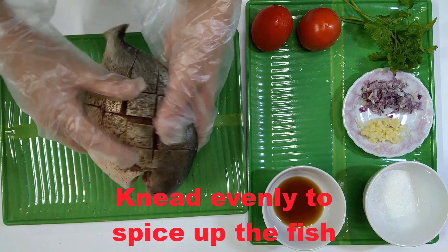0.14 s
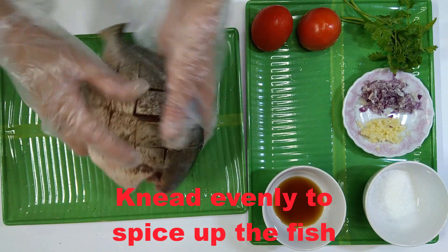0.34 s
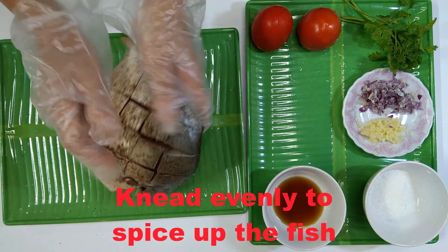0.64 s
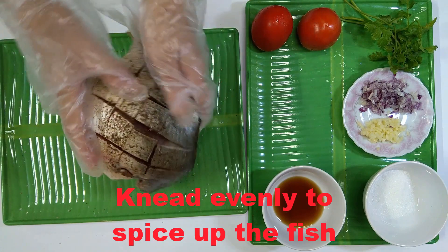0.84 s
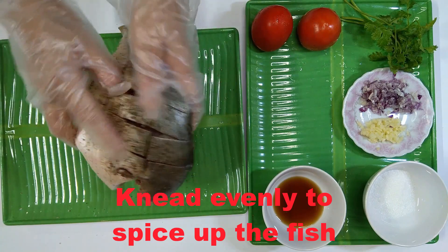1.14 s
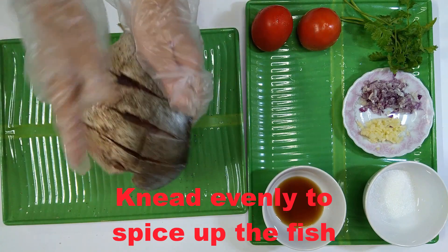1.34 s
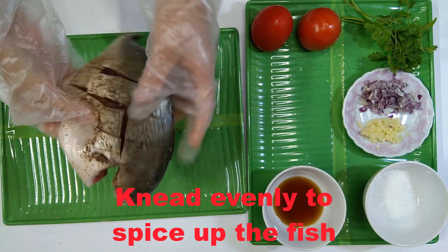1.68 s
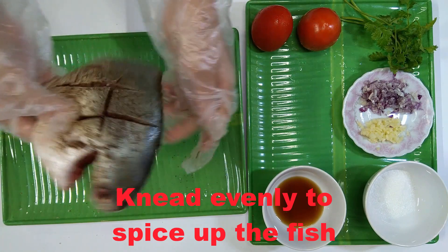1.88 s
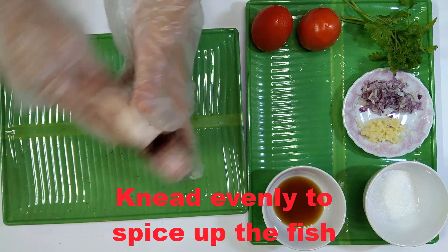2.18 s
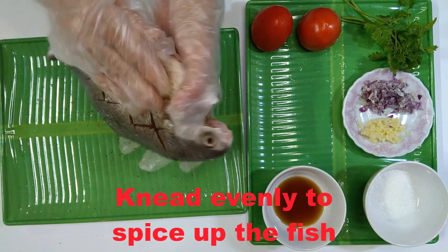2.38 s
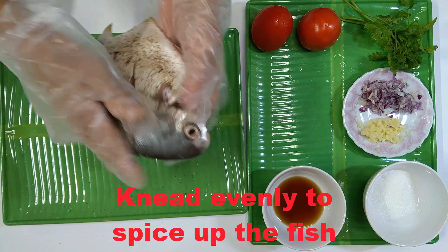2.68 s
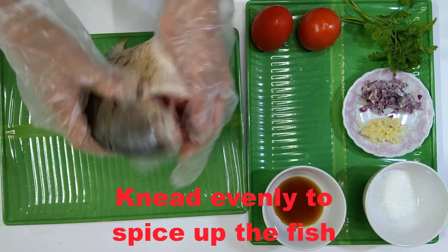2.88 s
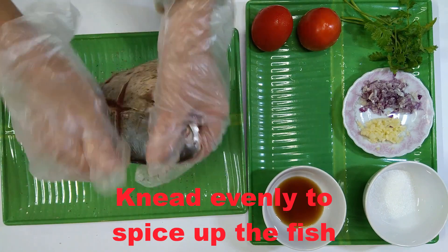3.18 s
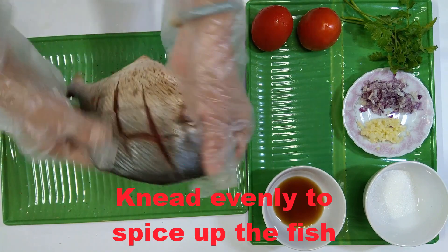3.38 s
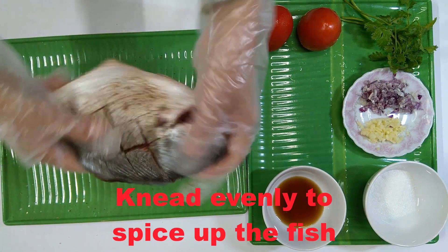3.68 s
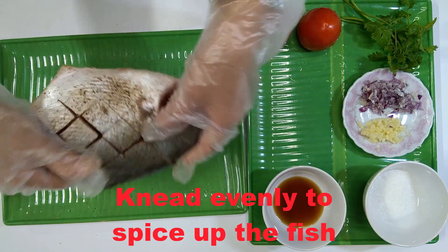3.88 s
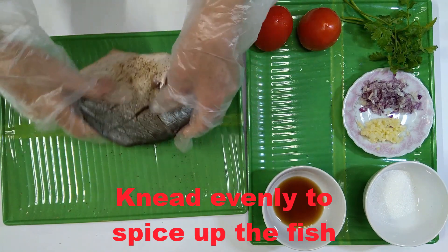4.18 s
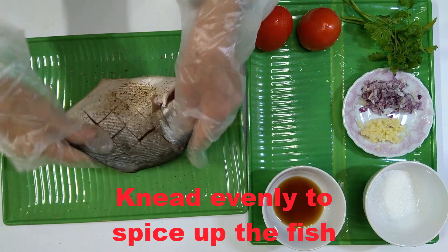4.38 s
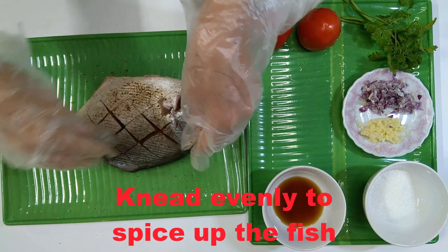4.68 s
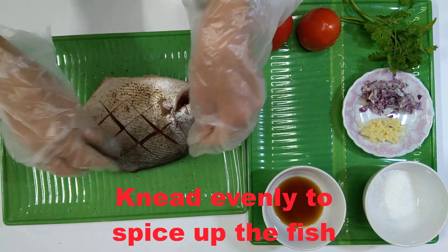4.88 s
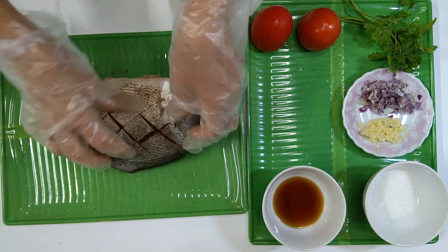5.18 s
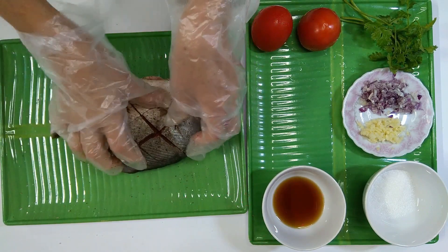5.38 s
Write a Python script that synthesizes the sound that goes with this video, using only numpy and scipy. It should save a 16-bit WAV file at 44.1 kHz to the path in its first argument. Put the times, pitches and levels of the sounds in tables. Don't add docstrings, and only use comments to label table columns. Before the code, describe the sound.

Close, crisp crackling of flimsy plastic gloves kneading salt into fish, with sharp film snaps and a few soft slaps on a hollow tray.

```python
import sys
import numpy as np
from scipy import signal
from scipy.fft import rfft, irfft, next_fast_len
from scipy.io import wavfile
from scipy.ndimage import uniform_filter1d, map_coordinates

SR = 44100
rng = np.random.default_rng(int(sys.argv[2]) if len(sys.argv) > 2 else 0)


def generate_wav(sig):
    pcm = np.round(np.clip(np.atleast_2d(sig).T, -1, 1) * 32767).astype(np.int16)
    wavfile.write(sys.argv[1], SR, pcm)


def ratio_of_db(decibels):
    return 10 ** (np.asarray(decibels, float) / 20)


N = 244446


def unit(x):
    return x / np.sqrt(np.mean(x ** 2) + 1e-20)


def along(points, hz):
    f, v = np.transpose(points)
    return np.interp(np.log(hz + 1), np.log(f + 1), v)


def wobble(rate):
    knots = rng.standard_normal(int(N * 40 / SR) + 4)
    return map_coordinates(knots, [np.arange(N) * min(rate, 40) / SR])


def filtered(x, response):
    m = next_fast_len(N + 8192)
    return irfft(rfft(x, m) * response(np.fft.rfftfreq(m, 1 / SR)), m)[..., :N]


def panned(pair, pan_db):
    common, other = pair
    return np.array([(common + other) * ratio_of_db(pan_db / 2), (common - other) * ratio_of_db(-pan_db / 2)])


def gloves():
    # hz, level_db (per Hz)
    film_curve = [(6500, -34), (7750, -32), (8050, -5), (9100, -0.5), (9700, -2.5), (10300, -22),
                  (12000, -34)]
    skin_curve = [(8000, -37), (9400, -11), (10000, -1.5), (11700, -4.5), (12500, -7.5), (14000, -48)]
    sheen_curve = [(6940, -27), (11800, -4.5), (15100, -4), (16000, -17)]
    folds_curve = [(4000, -52), (4900, -11), (5100, -1), (6000, 1.5), (7000, 3), (7800, 5.5), (8300, 3.5),
                   (10000, -40)]
    salt_curve = [(700, -13.5), (1100, -16.5), (1800, -8), (2600, -2.5), (3500, -0.5), (4400, 1.5),
                  (4750, 1), (5200, -2), (8000, -120)]
    # hz, level_db
    spread_curve = [(7500, 14), (9000, 7), (11000, 7.5), (12000, -16), (14000, 10), (14800, 7.5)]
    dull_hz, dull_db = 6650, 3
    overstretch = 3.6

    film_db, taut_db, folds_db, salt_db = strokes()
    pan_db, wide_db = film_stereo()
    tilt_db = np.clip(taut_db + 3, -8, 4)

    film = crackle(film_curve, 3000, scatter_db=4.0, life=0.0012, clump_db=-2.0, patchy_db=1.0)
    film = film * ratio_of_db(film_db - 8 - 0.59 * tilt_db)
    skin = crackle(skin_curve, 3000, scatter_db=3.0, life=0.0068, clump_db=2.0, patchy_db=0.0)
    skin = skin * ratio_of_db(film_db - 6.0 + 1.08 * tilt_db - overstretch * np.clip(taut_db, 0, 5))
    sheen = crackle(sheen_curve, 3000, scatter_db=2.5, life=0.0011, clump_db=1.5, patchy_db=0.7)
    sheen = sheen * ratio_of_db(film_db + taut_db - 0.3)
    folds = crackle(folds_curve, 2000, scatter_db=2.2, life=0.0025, clump_db=1.2, patchy_db=1.5)
    folds = folds * ratio_of_db(folds_db - 0.3)
    salt = crackle(salt_curve, 2500, scatter_db=1.5, life=0.0073, clump_db=0.8, patchy_db=0.6)
    salt = salt * ratio_of_db(salt_db - 1.3)

    common, other = film + skin + sheen
    widened = np.clip((wide_db + 16) / 13, 0, 1)
    narrow_other = filtered(other, lambda hz: ratio_of_db(along(spread_curve, hz)))
    other = ratio_of_db(wide_db) * (widened * other + (1 - widened) * narrow_other)
    dulled = ratio_of_db(dull_db) * filtered(folds, lambda hz: 1 / (1 + (hz / dull_hz) ** 16))
    folds = (1 - widened) * folds + widened * dulled
    return panned([common, other], pan_db) + panned(folds, 3.7) + panned(salt, 5.9)


def crackle(spectrum, rate, scatter_db, life, clump_db, patchy_db):
    fires = rng.random(N) < rate / SR * ratio_of_db(clump_db * wobble(30))
    energy = fires * ratio_of_db(2 * scatter_db * np.minimum(rng.exponential(size=N), 4))
    energy = signal.lfilter([1], [1, -np.exp(-1 / (life * SR + 1))], energy)
    burst = np.sqrt(energy + 0.2 * np.mean(energy)) * rng.standard_normal((2, N))
    z = signal.stft(burst, nperseg=512)[2]
    field = uniform_filter1d(rng.standard_normal(z.shape[1:]), size=7, axis=0)
    field = uniform_filter1d(field, size=9, axis=1)
    burst = signal.istft(z * ratio_of_db(patchy_db * unit(field)), nperseg=512)[1][:, :N]
    pair = filtered(burst, lambda hz: ratio_of_db(along(spectrum, hz)))
    return pair / np.sqrt(np.mean(pair[0] ** 2))


def strokes():
    # time_s, film_db
    contact = [(0.0, -39.5), (0.2, -43.5), (1.0, -44), (1.8, -40.5), (2.1, -50.5), (2.3, -56), (3.2, -40.5),
               (3.4, -43), (3.8, -43), (4.25, -48.5), (5.0, -48.5), (5.54, -50)]
    # peak_s, film_db, fading_s
    rubs = [(0.082, -42.5, 0.015), (0.342, -47, 0.012), (0.813, -43.5, 0.049), (0.899, -44, 0.021),
            (1.081, -41.0, 0.026), (1.441, -45.3, 0.044), (1.964, -41.1, 0.074), (2.163, -40, 0.028),
            (2.22, -37.0, 0.05), (2.298, -40, 0.015), (2.351, -37, 0.037), (2.506, -38, 0.064),
            (2.676, -40.6, 0.056), (2.75, -40.5, 0.017), (2.873, -37, 0.078), (3.08, -38.5, 0.079),
            (3.535, -42.4, 0.025), (3.816, -40.5, 0.051), (3.903, -45, 0.046), (4.412, -46, 0.074),
            (4.544, -43.5, 0.033), (4.658, -44.5, 0.034), (5.138, -43, 0.025), (5.212, -45, 0.022),
            (5.46, -48.5, 0.051)]
    # peak_s, film_db, fading_s, taut_db, crumple_db
    grabs = [(0.524, -36, 0.023, -1.5, -5.5), (0.572, -36, 0.036, -3.5, -4),
             (0.64, -38.5, 0.043, -2.5, -11), (1.549, -34, 0.03, -6, -6), (1.741, -38, 0.012, 3, -1.5),
             (2.918, -32.5, 0.022, -5.5, -7.5), (3.135, -36, 0.019, -4.5, -10.5),
             (3.288, -36.5, 0.015, 1, -9.5), (4.09, -43, 0.017, -2, -14), (4.135, -30.5, 0.02, -8.5, -7.5),
             (4.912, -44, 0.029, 3, -5)]
    # peak_s, film_db, fading_s, taut_db, crumple_db
    tugs = [
        (1.216, -29.5, 0.023, -10, -11),
        (1.266, -33, 0.02, -7.5, -13.5),
        (1.541, -31.5, 0.013, -12, -8.5),
        (1.693, -35.5, 0.022, 2.5, -7.5),
        (4.749, -48.5, 0.0071, 0, -1.5),
    ]
    fade_db = 6

    t = np.arange(N) / SR
    rest_db = np.interp(t, *np.transpose(contact))
    power = ratio_of_db(2 * (rest_db + np.array([[0], [-2.5], [-14], [-19]])))
    moves = [(*row, -2.5, -12.5, -18, 0.66) for row in rubs]
    moves += [(*row, -21.5, 0.72) for row in grabs]
    moves += [(*row, -27.5, 0.17) for row in tugs]
    for s, db, fading, taut_db, crumple_db, salt_db, rise in moves:
        near = slice(max(round(s * SR) - SR // 2, 0), round(s * SR) + SR // 2)
        u = (t[near] - s) / (fading * np.where(t[near] < s, rise, 1) + 1e-4)
        swell_db = db - fade_db * (np.sqrt(1 + u * u) - 1)
        power[:, near] += ratio_of_db(2 * (swell_db + np.array([[0], [taut_db], [crumple_db], [salt_db]])))
    film_db, sheen_db, folds_db, salt_db = 10 * np.log10(power)
    return film_db, sheen_db - film_db, folds_db, salt_db


def film_stereo():
    # start_s, length_s, spread_db, left_minus_right_db
    width_steps = [
        (1.21, .085, -17, 1),
        (1.692, 0.067, -4.5, 5),
        (3.27, 0.036, -9, 1.5),
        (4.117, 0.066, -19, 3),
    ]
    narrow_db, narrow_pan_db, edge_s, sway_db = -16, 1.7, 0.012, 1.1

    t = np.arange(N) / SR
    wide_db = np.full(N, float(narrow_db))
    pan_db = narrow_pan_db + sway_db * wobble(4.2)
    for s, length, spread_db, lean_db in width_steps:
        gate = np.clip(np.minimum(t - s, s + length - t) / edge_s + 1, 0, 1)
        wide_db = wide_db + gate * (spread_db - narrow_db)
        pan_db = pan_db + gate * (lean_db - narrow_pan_db)
    return pan_db, wide_db


def snaps():
    # start_s, left_peak_db, right_peak_db, pitch_hz, t60_s
    folds_let_go = [(0.4414, -30, -32, 10100, .03), (1.2150, -17.5, -4.5, 13500, .03),
                    (1.2180, -16, -8, 9000, .05), (1.2284, -23, -22, 8900, .03),
                    (1.2418, -23, -25, 9200, .03), (1.2674, -16, -15, 9100, .04),
                    (1.2710, -23, -24, 9300, .04), (1.5415, -18.5, -21, 8600, .04),
                    (1.6922, -15, -22, 8600, .05), (1.6945, -19, -25, 13500, .04),
                    (2.8984, -24, -27, 8640, .03), (3.2799, -25, -22, 13700, .03),
                    (4.1205, -23, -25, 8450, .03), (4.1464, -23, -25, 9000, .03)]
    out = np.zeros((2, N + SR))
    t = np.arange(SR // 8) / SR - 64 / SR
    hz = np.fft.rfftfreq(len(t), 1 / SR)
    for s, left_db, right_db, pitch_hz, t60 in folds_let_go:
        shape = ratio_of_db(-60 * t / 0.0034) + 0.04 * ratio_of_db(-60 * t / t60)
        shape = shape * np.clip(t / 0.00027, 0, 1)
        colour = 0.25 + 1 / (1 + ((hz - pitch_hz) / 1800) ** 2)
        colour = colour / (1 + (5600 / (hz + 1)) ** 12) / (1 + (hz / 15500) ** 40)
        crack = irfft(rfft(shape * rng.standard_normal((2, len(t)))) * colour, len(t))
        crack = crack + 0.15 * crack[::-1]
        crack = crack / np.abs(crack).max(axis=1, keepdims=True)
        out[:, round((s + t[0]) * SR):][:, :len(t)] += ratio_of_db([[left_db], [right_db]]) * crack
    return out[:, :N]


def bumps():
    # start_s, slap_db, thud_db, thud_hz
    fish_hits = [
        (0.552, -68, -64, 95),
        (2.906, -58, -79, 100),
        (2.928, -54, -65, 110),
        (2.9538, -41, -70, 100),
        (2.979, -56, -54, 114.5),
        (4.735, -49, -79, 89.5),
        (4.747, -38.5, -48, 84),
        (4.791, -67, -57, 78),
        (4.844, -60, -65, 84),
    ]
    # hz, width_hz, level_db
    tray_modes = [(295, 54, -6.5), (600, 340, -20), (1066, 115, -2), (1450, 200, 1.5), (1766, 210, -1),
                  (2320, 260, -8), (3700, 760, -10)]
    # pitch_over_thud (ratio), level_db, t60_s
    table_modes = [(1, 6, 0.14), (1.25, -8, 0.18)]

    slap, thud, t = np.zeros((2, N + SR)), np.zeros(N + SR), np.arange(SR // 4) / SR
    shape = ratio_of_db(-60 * t / 0.03) + ratio_of_db(-6.5 - 60 * t / 0.14)
    shape = shape * (1 - np.exp(-t / 0.00062))
    for s, slap_db, thud_db, thud_hz in fish_hits:
        noise = rng.standard_normal((2, len(t))) * [[1], [0.6]]
        slap[:, round(s * SR):][:, :len(t)] += ratio_of_db(slap_db + 10.5) * shape * noise
        ring = sum(ratio_of_db(db - 60 * t / t60) * np.sin(2 * np.pi * ratio * thud_hz * t)
                   for ratio, db, t60 in table_modes)
        thud[round(s * SR):][:len(t)] += ratio_of_db(thud_db + 4.5) * ring * (1 - np.exp(-t / 0.0038))

    def tray(f):
        return sum((-1) ** k * ratio_of_db(db) * 1j * f * w / (c * c - f * f + 1j * f * w)
                   for k, (c, w, db) in enumerate(tray_modes))

    return panned(filtered(slap[:, :N], tray), 7.9) + thud[:N] * ratio_of_db([[2.5], [-2.5]])


def creaks():
    # start_s, level_db, pitch_hz, t60_s, roughness (0-1)
    flexes = [
        (.06, -49.5, 555, .12, 0.3),
        (.15, -53.5, 557, 0.19, 0.03),
        (.25, -50, 532, 0.085, 0.3),
        (.47, -53, 566, 0.11, 0.3),
        (2.86, -58.5, 1020, 0.8, 0.85),
        (2.93, -53, 600, 0.23, 0.84),
        (3.029, -61.5, 991, 0.66, 0.93),
    ]
    flutter_s = 0.0057
    out, t = np.zeros(N + SR), np.arange(SR // 5) / SR
    for s, db, hz, t60, rough in flexes:
        noise = rng.standard_normal((2, len(t)))
        a, b = unit(uniform_filter1d(noise, size=round(flutter_s * SR), axis=1))
        tone = (1 - rough + rough * a) * np.sin(2 * np.pi * hz * t)
        tone = tone + rough * b * np.cos(2 * np.pi * hz * t)
        shape = ratio_of_db(db - 60 * t / t60) * (1 - np.exp(-t / 0.014))
        shape = shape * np.clip((t[-1] - t) / 0.038, 0, 1)
        out[round(s * SR):][:len(t)] += shape * tone
    return out[:N] * ratio_of_db([[5], [-2]])


def kitchen():
    # hz, level_db (per Hz)
    air_curve = [(18, -15), (30, -1.5), (97, 6), (195, -4.5), (240, -7), (290, -7), (484, -5.5),
                 (755, -8.5), (954, -7), (1630, -11), (2930, -7), (4780, -13.5), (7460, -6), (8000, -2),
                 (10400, -9.5), (17600, -120)]
    # hz, likeness (0-1)
    alike_curve = [(60, 1), (150, 0.8), (380, 0.8), (950, 0.087), (2380, 0.079), (5980, 0.038),
                   (15000, 0.44)]
    # hz, rms_db
    hum_partials = [(246, -73.5), (491, -85)]
    # hz, left_minus_right_db
    lean_curve = [(60, 10), (240, 2.5), (950, 9), (3770, 10.5), (15000, 13.5)]

    def mid_side(hz):
        turn = np.arccos(np.clip(along(alike_curve, hz), -1, 1)) / 2
        return ratio_of_db(along(air_curve, hz)) * np.array([np.cos(turn), np.sin(turn)])

    mid, side = filtered(rng.standard_normal((2, N)), mid_side)
    air = np.array([mid + side, mid - side]) / np.sqrt(np.mean(mid ** 2))
    bass = filtered(air, lambda hz: 1 / (1 + (hz / 170) ** 4))
    air = air + (ratio_of_db(traffic()) - 1) * bass
    drift = np.cumsum(1 + 0.0059 * wobble(6)) / SR
    hum = sum(ratio_of_db(db + 3.5 * wobble(5)) * np.sin(2 * np.pi * hz * drift) for hz, db in hum_partials)
    both = ratio_of_db(-58.5 + 1.0 * wobble(2.87)) * air + hum
    return filtered(both, lambda hz: ratio_of_db(np.outer([0.5, -0.5], along(lean_curve, hz))))


def traffic():
    # peak_s, swell_db, width_s
    passes = [
        (0.52, 3.5, 0.47),
        (1.47, 6, 0.14),
        (1.88, 10, .1),
        (2.96, 3, 0.13),
        (4.3, 1.5, 0.18),
        (4.88, 5, .12),
        (5.5, 4.5, 0.46),
    ]
    t = np.arange(N) / SR
    swell_db = sum(db * np.exp(-((t - s) / width) ** 2) for s, db, width in passes)
    return swell_db - np.mean(swell_db)


def scene():
    return gloves() + snaps() + bumps() + creaks() + kitchen()


def dropouts(x):
    # hz, depth_db
    depth_curve = [(1200, 2), (2500, 6), (3700, 17), (4800, 42), (6000, 32), (7800, 28), (8300, 0),
                   (11500, 0), (13000, 10), (15500, 4)]
    mid_side = np.array([x[0] + x[1], x[0] - x[1]]) / 2
    hz, _, z = signal.stft(mid_side, SR, nperseg=2048, noverlap=1536)
    field = uniform_filter1d(rng.standard_normal(z.shape), size=7, axis=1)
    field = unit(uniform_filter1d(field, size=5, axis=2))
    depth_db = along(depth_curve, hz)[:, None] * np.clip(3 * (field - 0.45), 0, 1.4)
    mid, side = signal.istft(z * ratio_of_db(-depth_db), SR, nperseg=2048, noverlap=1536)[1][:, :N]
    return np.array([mid + side, mid - side])


def band_limit(x):
    return signal.sosfilt(signal.butter(12, 15810, fs=SR, output="sos"), x)


def record(dry):
    band = filtered(dry, lambda hz: (hz < 15800) / (1 + (34 / (hz + 1)) ** 6))
    mix = dropouts(band)
    return band_limit(mix)


dry = scene()
out = record(dry)
generate_wav(out)
```